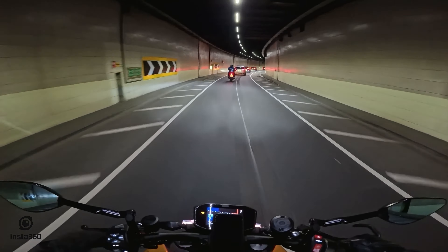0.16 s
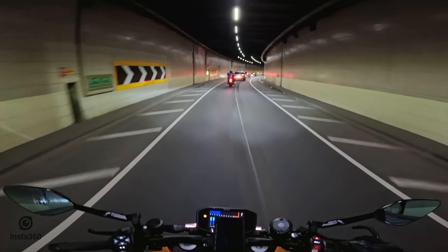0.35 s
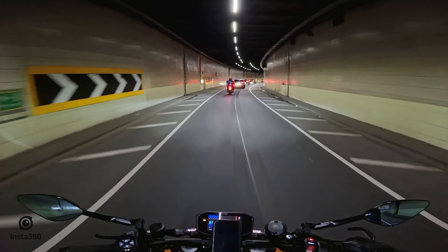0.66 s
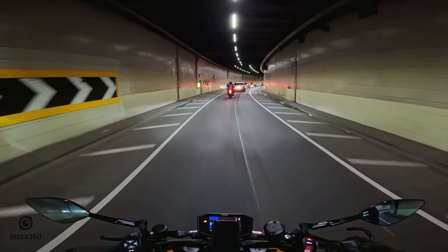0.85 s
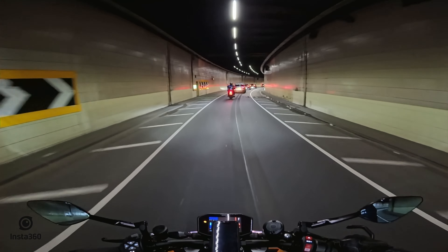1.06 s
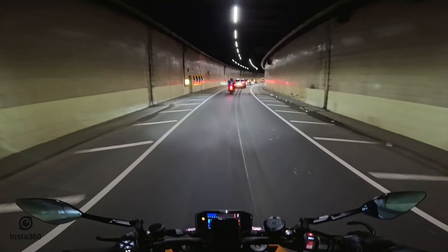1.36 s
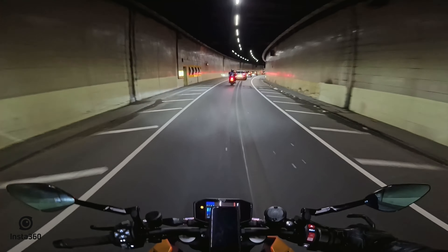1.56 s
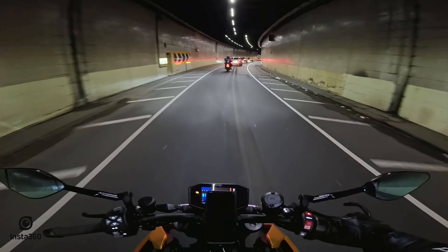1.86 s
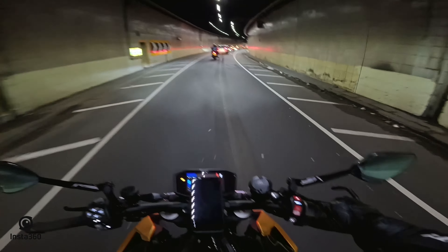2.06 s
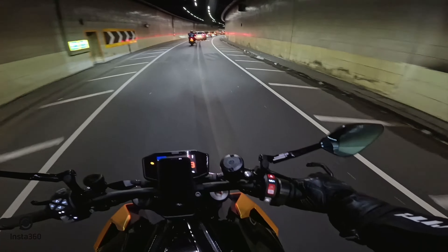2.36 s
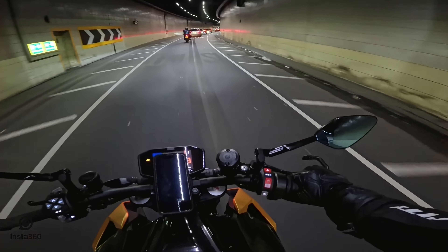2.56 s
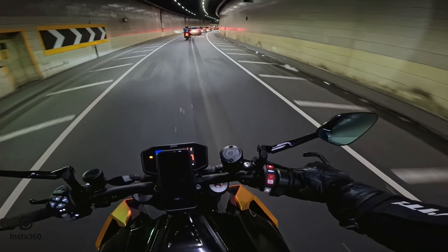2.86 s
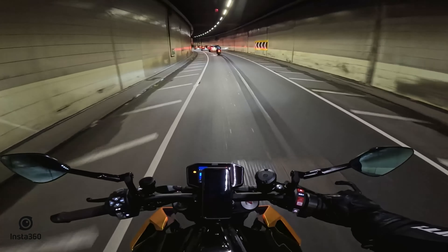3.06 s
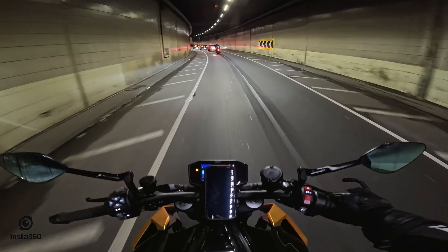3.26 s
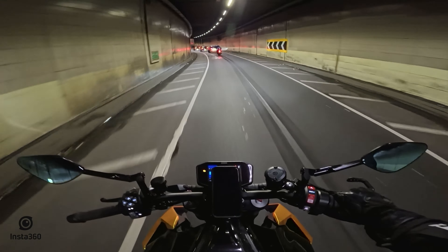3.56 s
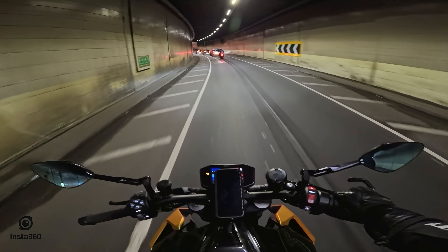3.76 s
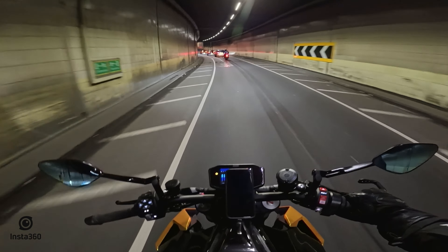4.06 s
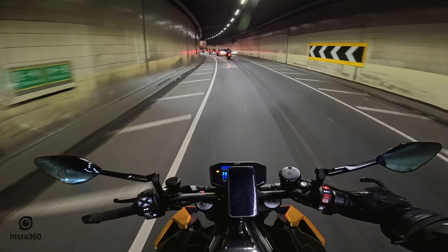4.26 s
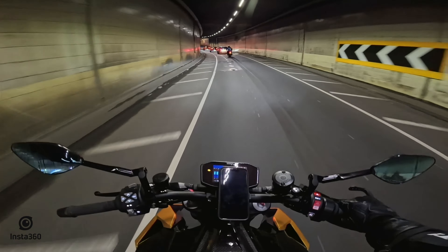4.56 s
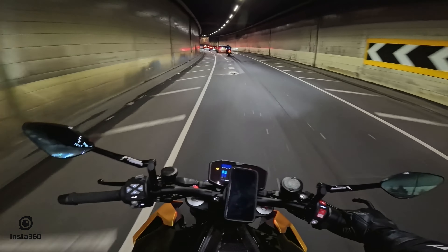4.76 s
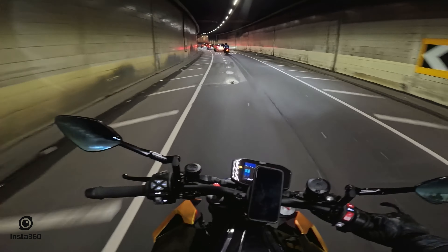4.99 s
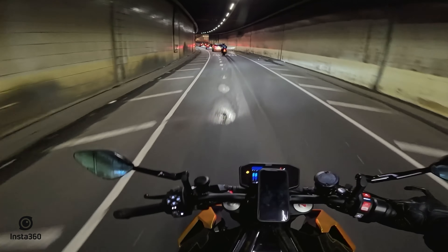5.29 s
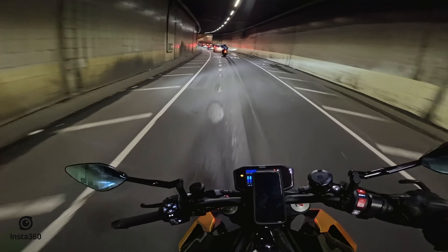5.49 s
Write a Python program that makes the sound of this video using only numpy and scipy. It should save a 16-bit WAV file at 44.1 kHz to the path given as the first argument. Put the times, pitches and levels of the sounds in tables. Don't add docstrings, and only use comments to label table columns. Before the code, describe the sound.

A twin-cylinder motorcycle with a loud open exhaust, heard from an onboard camera microphone in a long, hard-walled road tunnel. At 0 s it comes off throttle at full loudness: a sharp bang, then a dense crackle of afterfire and rushing gas that thins within half a second. From 0.5 to 2.5 s the ragged burble slows and sinks in pitch, with scattered lighter pops, becoming quiet just before 3 s. A distant engine drones at the start and swells briefly around the shift. At 3.0 s the gear drops abruptly, the pitch jumps, and a deep, uneven but regular throb pulls steadily with slowly climbing pitch. From about 4.2 to 5 s the low boom thins into a harder mid bark with stronger cracks; it refills after 5.2 s with brief dropouts, ending abruptly at about 5.6 s. Tyre roar and fluttering wall echoes continue throughout; loud beats distort.

```python
import sys
import numpy as np
from scipy import signal
from scipy.fft import rfft, irfft, next_fast_len
from scipy.io import wavfile
from scipy.ndimage import uniform_filter1d, minimum_filter1d

SR = 44100
rng = np.random.default_rng(int(sys.argv[2]) if len(sys.argv) > 2 else 0)


def convert_level_to_amplitude(level_db):
    exponent = np.asarray(level_db, float) / 20
    return 10 ** exponent


def digitize_waveform(pressure):
    field = np.atleast_2d(pressure).T
    bounded = np.clip(field, -1, 1)
    quanta = np.round(bounded * 32767).astype(np.int16)
    wavfile.write(sys.argv[1], SR, quanta)


N = 248283
SHIFT_S, SHIFT_TAKES_S = 2.995, .015


def level(x, db):
    return x * convert_level_to_amplitude(db) / np.sqrt(np.mean(x ** 2))


def ring(x, modes):
    out = 0
    for hz, width_hz, db in modes:
        radius = np.exp(-np.pi * width_hz / SR)
        angle = 2 * np.pi * hz / SR
        feedback = [1, -2 * radius * np.cos(angle), radius * radius]
        out = out + convert_level_to_amplitude(db) * (1 - radius) * np.sin(angle) * signal.lfilter([0, 1], feedback, x)
    return out


def colour(x, table):
    pad = SR // 8
    size = next_fast_len(N + 2 * pad)
    hz, db = np.transpose(table)
    bins_hz = np.arange(size // 2 + 1) * SR / size
    gain = convert_level_to_amplitude(np.interp(np.log(bins_hz + 1), np.log(hz), db))
    return irfft(rfft(np.pad(x, pad, "reflect"), size) * gain, size)[pad:pad + N]


def walk(rate):
    hold = int(SR / rate)
    steps = np.repeat(rng.standard_normal(N // hold + 1), hold)
    return 1.3 * uniform_filter1d(uniform_filter1d(steps, hold), hold)[:N]


def clicks(s, size):
    out = np.zeros(N)
    np.add.at(out, np.clip((s * SR).astype(int), 0, N - 1), size)
    return out


def puff(x, decay_s):
    fade = np.exp(-1 / (decay_s * SR))
    envelope = signal.lfilter([(1 - fade) * np.e], [1, -2 * fade, fade * fade], x)
    return envelope * rng.standard_normal(N)


def soften(x, ms):
    u = np.arange(-3 * ms, 3 * ms, 1000 / SR) / ms
    return signal.fftconvolve(x, np.exp(-2 * u ** 2), "same")


def engaged(t):
    return np.clip((t - SHIFT_S) / SHIFT_TAKES_S, 0, 1)


# frequency [Hz], density [dB per Hz].
HOUSING_NOISE = [(15, -10), (30, 0), (45, 0), (70, -25), (300, -56), (6000, -57), (15700, -57),
                 (16200, -95)]


def housing_noise():
    return level(colour(rng.standard_normal(N), HOUSING_NOISE), -46)


# frequency [Hz], density [dB per Hz].
ROAR_SPECTRUM = [(260, -24), (450, -6.5), (538, -2.5), (561, -9.5), (780, -22), (858, -8.5), (958, -20.5),
                 (1350, -29), (2650, -36.5), (3530, -33), (3840, -34.5), (5410, -38), (12000, -55.5),
                 (15600, -88.5), (22000, -120)]


def roar(gas_db, hiss_db):
    swell = walk(0.58)
    out = 0
    for band_hz, db in (((300, 900), gas_db), ((900, 1800), gas_db),
                        ((1800, 5000), hiss_db), ((5000, 16000), hiss_db)):
        band = signal.butter(2, band_hz, "band", fs=SR, output="sos")
        noise = signal.sosfilt(band, rng.standard_normal(N))
        out = out + noise * convert_level_to_amplitude(db - np.mean(db) + .5 * swell + 1.0 * walk(6.5))
    return level(colour(out, ROAR_SPECTRUM), -36.5)


# loudest moment [s], level [dB], rise before and fall after [dB per s].
DRONE_SWELLS = [
    (0, -19, 30, 68),
    (2.971, -24, 37, 50),
]


def drone(t):
    floor_db = -45
    db = np.max([peak_db - np.where(t < at, before * (at - t), after * (t - at))
                 for at, peak_db, before, after in DRONE_SWELLS], axis=0)
    tone = np.sin(2 * np.pi * 366 * t + 1.3 * walk(12))
    return tone * convert_level_to_amplitude(np.maximum(db, floor_db) + 3.5 + 0.62 * walk(11))


# frequency [Hz], gain [dB].
WALL_COLOUR = [(30, -19), (60, -12), (100, 0.5), (200, 6), (400, 7.5), (3000, -1.5), (9000, -15)]


def tunnel(x, count=5, drift=9.0):
    t60_s = 2.07
    t = np.arange(SR) / SR
    tails = rng.standard_normal((count, SR)) * convert_level_to_amplitude(-60 * t / t60_s) * (t > .02)
    lead_in = SR // 2
    past = x[lead_in:0:-1]
    out = 0
    for tail in tails:
        path = np.r_[past * rng.standard_normal(), x * walk(drift)]
        out = out + signal.fftconvolve(path, tail)[lead_in:lead_in + N]
    return colour(level(out, 0) * np.sqrt(np.mean(x ** 2)), WALL_COLOUR)


# delay at the start [ms], delay at the end [ms], level [dB].
NEAR_WALLS = [(10.645, 14.56, -12.5), (18.74, 16.98, -16), (26.88, 30, -19)]


def walls(x):
    n = np.arange(N)
    out = x
    for start_ms, end_ms, db in NEAR_WALLS:
        delay = np.linspace(start_ms, end_ms, N) * SR / 1000
        out = out + convert_level_to_amplitude(db) * np.interp(n - delay, n, x, left=0)
    return out


# centre [Hz], half width [Hz], level [dB].
TUBE_WAVES = [(218.8, 7.7, -26.5), (230.5, 6.4, -28), (252.7, 2.5, -22.5), (280, 7.2, -34.5),
              (352.7, 4.5, -24.5), (373.2, 7, -25), (393.4, 6, -27), (426.4, 12, -34.5), (567.6, 19, -43.5),
              (620.4, 22, -38.5), (696, 10, -44)]


def lifted_orders(t):
    hz = np.interp(t, *np.transpose(COAST_REVS + PULL_REVS))
    hz = uniform_filter1d(hz, int(SHIFT_TAKES_S * SR))
    phase = 2 * np.pi * np.cumsum(hz) / SR
    drive_db = (1 - engaged(t)) * (-1.5 - 4 * t)
    coarse = slice(None, None, 64)
    out = 0
    for order in range(7, 24):
        order_hz = order * hz[coarse]
        lift = sum(convert_level_to_amplitude(db) / (1 + ((order_hz - mid_hz) / half_hz) ** 2) for mid_hz, half_hz, db in TUBE_WAVES)
        partial = np.sin(order * phase + 0.5 * walk(8))
        out = out + partial * np.interp(t, t[coarse], lift) * convert_level_to_amplitude(-0.5 + 2.0 * walk(7.4))
    return convert_level_to_amplitude(drive_db) * out


# start [s], peak [dB].
AFTERFIRE = [(0.0238, -14), (0.0361, -24), (0.048, -27), (0.0633, -23.5), (0.1028, -22.5), (0.1843, -23.5),
             (0.198, -19), (0.2194, -28.5), (0.328, -34), (0.3619, -28), (.393, -30.5), (0.4599, -31),
             (0.769, -26.5), (0.807, -33.5), (1.0203, -32.5), (1.056, -32.5), (1.0793, -30.5),
             (1.1669, -33), (1.2422, -37), (1.2784, -30), (1.3529, -34.5), (1.3913, -30.5), (1.506, -30.5),
             (1.626, -30.5), (1.7403, -34), (1.8666, -30), (1.989, -33.5), (2.113, -37), (2.371, -35.5),
             (2.4606, -37)]
# delay [s], level [dB].
POP_SLAPS = [(.0245, -7.5), (.0415, -11.5)]


def pops():
    lag_s, front = .0015, 7.7
    s, db = np.transpose(AFTERFIRE)
    bang = clicks(s + lag_s, convert_level_to_amplitude(db))
    for late_s, slap_db in POP_SLAPS:
        bang = bang + clicks(s + lag_s + late_s, convert_level_to_amplitude(db + slap_db))
    body = ring(front * bang + 0.94 * puff(bang, 0.0011), CRACK_MODES[:4])
    edge = ring(.6 * front * bang + 1.0 * puff(bang, 0.00062), [(6500, 2100, 0.0021)])
    return convert_level_to_amplitude(16) * body + convert_level_to_amplitude(-13.5) * edge


def flow(t):
    def pair(gas, hiss):
        return np.array([[gas], [hiss]])
    shut_db, settled_db, pulling_db = pair(-26, -39.5), pair(-35, -50.5), pair(-36.5, -56.5)
    die_away_s = pair(.5, 0.19)
    coast_db_per_s, pull_db_per_s = pair(-1.6, -2.5), pair(-0.7, 0.43)
    coasting = settled_db + (shut_db - settled_db) * np.exp(-t / die_away_s) + coast_db_per_s * t
    pulling = pulling_db + pull_db_per_s * (t - SHIFT_S)
    return coasting + engaged(t) * (pulling - coasting)


# frequency [Hz], width [Hz], level [dB].
CRACK_MODES = [(1180, 450, 5), (1930, 1100, -11), (3210, 900, -13), (4350, 620, -30.5), (6800, 670, -33)]
# frequency [Hz], width [Hz], level [dB].
SNAP_MODES = [(1203, 260, 2), (1960, 430, -12.5), (3200, 1000, -17)]


def gas_cracks(t, coast_gas, pull_gas, hiss_db):
    bursts = puff(walls(coast_gas + pull_gas), 0.0032)
    crack = level(ring(bursts, CRACK_MODES), 9.1) * convert_level_to_amplitude(hiss_db)
    snap = level(ring(soften(pull_gas, ms=.22), SNAP_MODES), -43)
    return crack + snap * np.interp(t, (3.2, 4.1), (.4, 1))


# time [s], engine cycles [per s].
COAST_REVS = [(0, 32.26), (0.2, 30.38), (0.5, 30.15), (0.9, 27.91), (1.3, 26.62), (1.7, 25.12),
              (2.1, 23.59), (2.5, 22.83), (2.99, 21.68)]
# time [s], engine cycles [per s].
PULL_REVS = [(2.995, 28.65), (3.3, 29.13), (3.7, 29.6), (4.1, 30.31), (4.5, 30.62), (4.9, 31.16),
             (5.3, 30.87), (5.63, 31.54)]
# second cylinder [dB], its crack [dB], scatter [dB],
# timing jitter [share of a cycle], crack [dB].
GEAR_FIRING = [
    (-2, -5, 1.5, .012, -5),
    (-8, -14, .8, .003, 0),
]


def firings(revs, known_s, throttle):
    second_db, second_crack_db, scatter_db, jitter, crack_db = throttle
    s, hz = np.transpose(revs)
    t = np.arange(int(s[0] * SR), min(int(s[-1] * SR), N)) / SR
    phase = np.cumsum(np.interp(t, s, hz)) / SR
    phase -= np.interp(known_s, t, phase)
    push, gas = 0, 0
    for offset, db, gas_db in ((0, 0, 0), (.625, second_db, second_crack_db)):
        cycle = np.arange(np.ceil(phase[0] - offset), phase[-1] - offset) + offset
        chance = rng.standard_normal((len(cycle), 3)).T
        when = np.interp(cycle + jitter * chance[0], phase, t)
        push = push + clicks(when, -convert_level_to_amplitude(db + scatter_db * chance[1]))
        gas = gas + clicks(when, convert_level_to_amplitude(crack_db + gas_db + 2.0 * chance[2]))
    return push, gas


# time [s], level [dB], bark over boom [dB].
EXHAUST_LEVEL = [(0, 1.5, -13.5), (0.198, -5, -2.5), (.5, -8.5, -5), (0.951, -9, -7.5), (1.348, -8, -8.5),
                 (1.902, -9, -5.5), (2.2, -10.5, -15), (2.6, -15, -13.5), (2.98, -15, -10),
                 (3.009, -6, -13), (3.298, -8.5, -7), (3.802, -9, -5.5), (4.301, -13, 8), (4.902, -14, 6),
                 (5.201, -8, -1.5), (5.63, -7, -7.5)]
# time [s], depth [dB], half length [s].
WEAK_FIRINGS = [(0.151, 3.5, 0.05), (1.076, 6, 0.013), (1.252, 6, 0.018), (1.557, 4.5, 0.046),
                (2.056, 22.5, 0.02), (2.166, 5.5, .02), (5.001, 6.5, 0.048), (5.192, 14.5, 0.01),
                (5.465, 12.5, 0.04), (5.577, 21.5, 0.011)]


def exhaust_levels(t):
    s, db, bark_db = np.transpose(EXHAUST_LEVEL)
    db, bark_db = np.interp(t, s, db), np.interp(t, s, bark_db)
    dip = sum(depth_db * np.exp(-((t - at) / half_s) ** 2) for at, depth_db, half_s in WEAK_FIRINGS)
    return db - bark_db / 2 - dip, db + bark_db / 2 - 0.12 * dip


# frequency [Hz], width [Hz], level [dB].
BOOM_MODES = [
    [(51.4, 34, -4.5), (67.9, 14, 8.5), (79, 15, 9), (84.2, 10, 10.5)],
    [(57.6, 22, 0.5), (89.2, 4.7, 10), (90, 6.7, 12)],
]
# frequency [Hz], width [Hz], level [dB].
BARK_MODES = [
    [(133, 8, 3), (125.6, 27, 3), (143.9, 3.9, 6), (173, 130, -1.5), (238, 59, -3.5), (365, 50, -24)],
    [(120.5, 28, 4), (152.7, 19, 1), (182.8, 16, -2), (270, 150, -11.5), (394.4, 24, -26.5)],
]
# frequency [Hz], width [Hz], level [dB].
RASP_MODES = [(543, 90, -2), (710, 180, -16), (825, 600, -3), (1200, 240, 1.5)]


def exhaust_pipe(push, boom_modes, bark_modes, boom_db, bark_db, gas_db):
    late = np.roll(push, int(3.73 * SR / 1000))
    boom = level(ring(soften(late, ms=0.3), boom_modes), -8) * convert_level_to_amplitude(boom_db)
    bark = level(ring(soften(push, ms=0.92), bark_modes), -3.5) * convert_level_to_amplitude(bark_db)
    rasp = level(ring(soften(push, ms=0.45), RASP_MODES), -7) * convert_level_to_amplitude(gas_db)
    return boom + bark + rasp


# frequency [Hz], side over mid [dB].
PORT_WIDTH = [(60, -43.5), (110, -32.5), (200, -22.5), (380, -13), (700, -9), (1290, -4.5), (2380, -3),
              (4400, -1.5), (8120, -2.5), (15000, -14)]


def two_ports(mid, diffuse):
    pad = SR // 8
    padded = np.pad(mid, pad, "reflect")
    turned = np.imag(signal.hilbert(padded, next_fast_len(N + SR // 4))[pad:pad + N])
    lead = level(walk(8.0), 0) * turned
    side = colour(convert_level_to_amplitude(-1) * lead + diffuse, PORT_WIDTH)
    return np.array([convert_level_to_amplitude(0.45) * mid + side, mid - side])


def scene():
    t = np.arange(N) / SR
    boom_db, bark_db = exhaust_levels(t)
    gas_db, hiss_db = flow(t)
    pipe, gear_gas = 0, []
    gears = zip((COAST_REVS, PULL_REVS), (1.055, 3.005), GEAR_FIRING, BOOM_MODES, BARK_MODES)
    for revs, known_s, throttle, boom_modes, bark_modes in gears:
        push, gas = firings(revs, known_s, throttle)
        pipe = pipe + exhaust_pipe(push, boom_modes, bark_modes, boom_db, bark_db, gas_db)
        gear_gas.append(gas)
    pipe = convert_level_to_amplitude(-0.28) * walls(pipe) + lifted_orders(t)
    crack = gas_cracks(t, *gear_gas, hiss_db) + pops()
    wet = convert_level_to_amplitude(np.interp(t, (2.97, 3.03), (-4, -10)))
    mid = pipe + crack + wet * tunnel(pipe + 1.06 * crack) + roar(gas_db, hiss_db) + drone(t)
    diffuse = convert_level_to_amplitude(-12) * tunnel(pipe + 2.5 * crack) + convert_level_to_amplitude(-6) * roar(gas_db, hiss_db)
    return two_ports(mid, diffuse)


def band_limit(x):
    return signal.sosfilt(signal.butter(12, 19780, fs=SR, output="sos"), x)


def record(dry):
    x = signal.sosfilt(signal.butter(3, 48, "high", fs=SR, output="sos"), dry)
    x = signal.sosfilt(signal.butter(2, 8500, fs=SR, output="sos"), x)
    x = x + housing_noise()
    span = SR // 50
    peak = uniform_filter1d(-minimum_filter1d(-np.abs(x).max(axis=0), span), span)
    x = x * np.minimum(1, 1.08 / peak) ** .7
    x = x * np.minimum(1, np.arange(N, 0, -1) / (.003 * SR))
    mix = np.clip(x, -1, 1)
    return band_limit(mix)


dry = scene()
out = record(dry)
digitize_waveform(out)
```